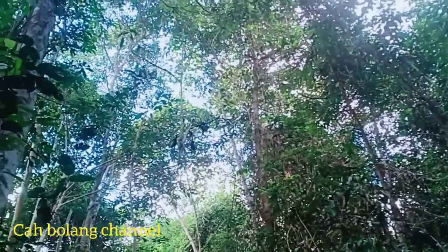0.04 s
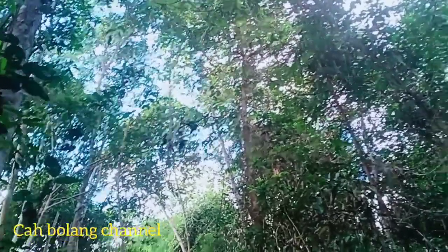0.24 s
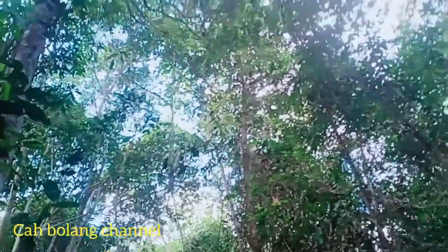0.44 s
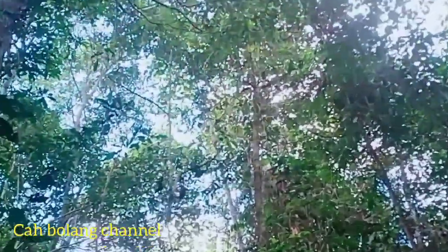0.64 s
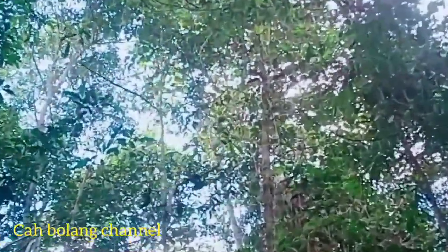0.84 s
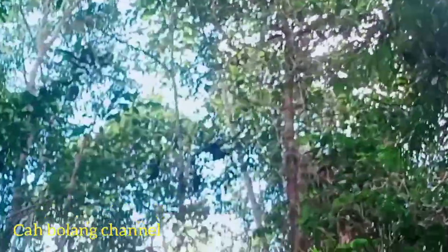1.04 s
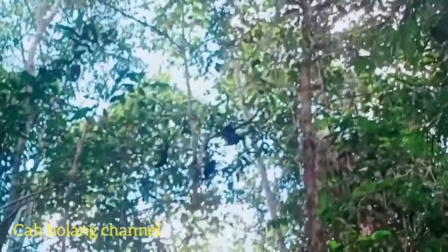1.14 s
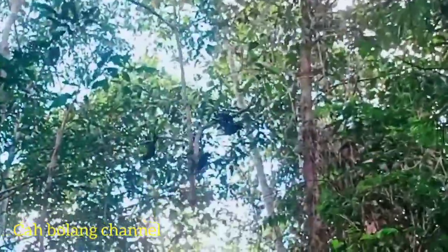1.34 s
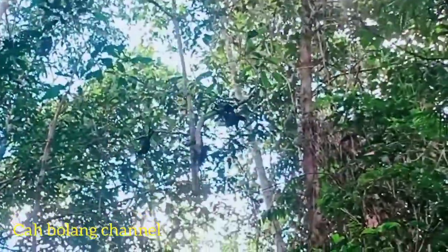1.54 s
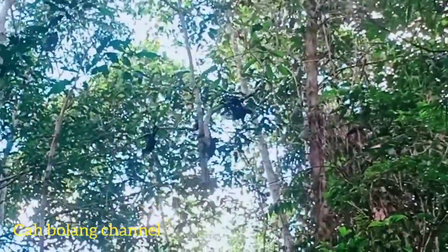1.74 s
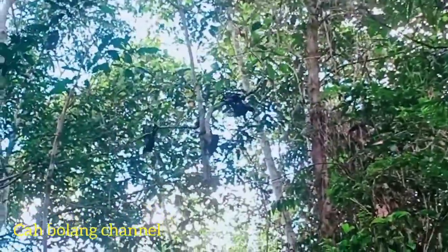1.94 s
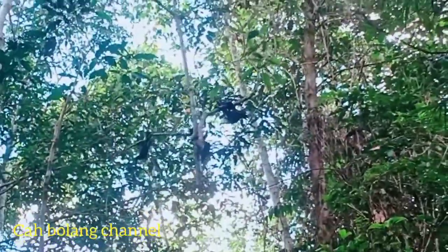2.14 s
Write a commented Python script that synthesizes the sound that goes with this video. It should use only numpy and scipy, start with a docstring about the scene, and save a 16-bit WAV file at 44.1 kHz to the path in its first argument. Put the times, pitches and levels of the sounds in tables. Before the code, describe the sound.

A distant bird gives short, harsh, buzzy rasps to the left, echoing among trees. Early on, hard knocks thump the microphone, followed by creaks and low rumble from handling; faint insects hiss steadily behind.

```python
"""A drongo rasps far off to the left: pulse trains ring two resonances, blurred by echoes among the trunks.
A finger knocks the hand-held camera three times, the first hard enough to clip: pushes ring case modes.
The grip then creaks and rumbles in shaped noise. Insects hiss in noise bands and chirp in gated tone;
a small bird tseeps in falling tones, leaves rustle and forest air murmurs in noise."""
import sys
import numpy as np
from scipy import signal
from scipy.fft import rfft, irfft, next_fast_len
from scipy.io import wavfile
from scipy.ndimage import map_coordinates

SR = 44100
rng = np.random.default_rng(int(sys.argv[2]) if len(sys.argv) > 2 else 0)


def to_wav(sig):
    """Store sig (one row per channel, or 1-D mono) as 16-bit WAV at the path in sys.argv[1].

    Samples outside -1..1 are clipped; the rate is SR.
    """
    pcm = np.clip(np.atleast_2d(sig), -1, 1) * 32767
    pcm = np.round(pcm).astype(np.int16)
    wavfile.write(sys.argv[1], SR, pcm.T)  # frames by channels


def volts_from_db(level):
    """Convert decibel levels to linear amplitude ratios."""
    exponent = np.asarray(level, float) / 20
    return 10 ** exponent


N = 97020
T = np.arange(N) / SR


def unit(x):
    """Scaled to rms 1."""
    return x / np.sqrt(np.mean(x ** 2) + 1e-20)


def along(points, hz):
    """Interpolates (hz, value) points on a log frequency axis."""
    point_hz, value = np.transpose(points)
    return np.interp(np.log(hz + 1), np.log(point_hz + 1), value)


def wobble(knots_hz):
    """Smooth random curve through knots_hz normal draws a second."""
    knots = rng.standard_normal(int(N * knots_hz / SR) + 4)
    return map_coordinates(knots, [T * knots_hz])


def filtered(x, response):
    """x times a complex response of frequency."""
    m = next_fast_len(N + SR // 2)
    return irfft(rfft(x, m) * response(np.fft.rfftfreq(m, 1 / SR)), m)[..., :N]


def panned(x, pan_db):
    """Left louder than right by pan_db."""
    return x * volts_from_db(np.array([[pan_db / 2], [-pan_db / 2]]))


def hump(u, attack):
    """Rises over the share attack of 0-1, then falls."""
    a = np.clip(attack, .05, .95)
    nearer_end = np.minimum(u / a, (1 - u) / (1 - a))
    return np.sin(np.pi / 2 * np.clip(nearer_end, 0, 1))


def band(hz, width_hz):
    """Bell-shaped gain, two standard deviations to the width."""
    return lambda f: np.exp(-.5 * ((f - hz) / (width_hz / 2)) ** 2)


def coloured(points):
    """Gain of an (hz, db) spectrum, silent outside it."""
    return lambda f: volts_from_db(along(points, f)) * (f >= points[0][0]) * (f <= points[-1][0])


def rush(gain):
    """Stereo noise of mid rms 1, as alike and as lopsided as the two ports hear the forest."""
    # likeness of the two ports: hz, likeness
    likeness = [(60, 0.67), (120, 0.63), (240, 0.28), (480, 0.14), (950, 0.24), (1890, 0.04), (3770, 0.016),
                (7520, 0.66), (15000, 0.51)]
    # left minus right level: hz, lean_db
    lean = [(60, -6), (120, 0), (240, 3), (480, 2), (950, 2), (1890, 1.5), (3770, 0), (7520, 8), (15000, 8)]

    def mid_side_gain(f):
        turn = np.arccos(np.clip(along(likeness, f), -1, 1)) / 2
        return gain(f) * np.array([np.cos(turn), np.sin(turn)])

    mid, side = filtered(rng.standard_normal((2, N)), mid_side_gain)
    lean_gain = lambda f: volts_from_db(along(lean, f) / 2 * np.array([[1], [-1]]))
    pair = filtered(np.array([mid + side, mid - side]), lean_gain)
    return pair / pair.mean(0).std()


def echoed(dry, pan_db):
    """A bird's direct sound plus equally strong decaying-noise echoes, near and far among the trunks."""
    near_t60_s, far_t60_s, far_db = 0.75, 1.3, -9
    decay = volts_from_db(-60 * T / near_t60_s) + volts_from_db(far_db - 60 * T / far_t60_s)
    tail = rng.standard_normal((2, N)) * decay * (T > .004)
    wet = signal.fftconvolve(dry[None], tail / np.linalg.norm(tail[0]), axes=1)[:, :N]
    return panned(dry, pan_db) + panned(wet, 8)


def rasp(start_s, length_s, level_db, first_hz, last_hz, attack, beak_hz):
    """Uneven syrinx pulses ring a sliding throat resonance and a second without a slide."""
    pulse_median_hz, gap_jitter = 170.9, .35
    size_scatter_db, pitch_scatter, beak_db = 2, .038, -1.23
    ring_peak_s = .002
    draw = rng.standard_normal((60, 6))
    when = np.cumsum(np.exp(gap_jitter * draw[:, 0])) / pulse_median_hz - .5 / pulse_median_hz
    u, t = when / length_s, np.arange(SR // 60) / SR
    size = hump(u, attack) * volts_from_db(level_db + 3 + size_scatter_db * draw[:, 1:3].T)
    throat_hz = first_hz + (last_hz - first_hz) * np.clip(u * 2.45 - .4, 0, 1)
    hz = np.array([throat_hz, beak_hz + 0 * u]) * (1 + pitch_scatter * draw[:, 3:5].T)
    envelope = (t / ring_peak_s * np.exp(1 - t / ring_peak_s)) ** 2
    throat, beak = size[..., None] * np.sin(2 * np.pi * hz[..., None] * t) * envelope
    at = ((start_s + when[:, None]) * SR).astype(int) + np.arange(len(t))
    return np.bincount(at.ravel(), (throat + volts_from_db(beak_db) * beak).ravel(), N + SR)[:N]


def drongo():
    """Falling rasps with a quick attack, and swelling rasps with a slow one."""
    # falling calls: start_s, length_s, level_db, first_hz, last_hz
    falling = [(0.039, 0.12, -57, 2525, 2030), (0.182, 0.19, -55, 2250, 2160),
               (.682, .12, -49.5, 2404, 2150), (0.876, 0.11, -49, 2443, 2150),
               (1.062, 0.11, -48, 2600, 2083), (1.251, .14, -47.5, 2600, 2170),
               (1.451, .14, -49.5, 2600, 2160)]
    # swelling calls: start_s, length_s, level_db, first_hz, last_hz
    swelling = [(.355, 0.11, -52.5, 2450, 2340), (.47, 0.2, -53.5, 2350, 2476)]
    dry = sum(rasp(*call, attack=0.21, beak_hz=2600) for call in falling)
    dry = dry + sum(rasp(*call, attack=0.54, beak_hz=2752) for call in swelling)
    return echoed(dry, 9)


def port_response(f, recoil_hz, recoil_q, modes):
    """A port's second-order recoil plus the case's band-pass resonances."""
    recoil = -f * f / (recoil_hz ** 2 - f * f + 1j * f * recoil_hz / recoil_q)
    ring = sum(gain * 1j * f * width_hz / (hz * hz - f * f + 1j * f * width_hz)
               for hz, width_hz, gain in modes)
    return recoil + ring


def push(start_s, length_s):
    """One smooth sine-squared shove."""
    return np.sin(np.pi * np.clip((T - start_s) / length_s, 0, 1)) ** 2


def knocks():
    """Each blow pushes both ports, which recoil; the case rings dully and clicks."""
    # finger blows: start_s, push_db, left_contact_ms, right_contact_ms, click_db
    strikes = [(.2318, 3.3, .96, 1.55, -29), (.2456, -8, 1.26, 2.0, -23), (.2768, -12, 1.0, 1.3, -23)]
    # case giving way just before a blow, left then right: lead_s, share of push
    giving = [(.00072, .16), (.00053, .21)]
    # port recoil, left then right: recoil_hz, q
    recoils = [(190, 3.6), (99, 4)]
    # case resonances, left then right: hz, width_hz, gain (negative = against the push)
    case_modes = [
        [(84, 37, -2), (159, 80, 2.8), (224, 48, -1.3), (500, 80, .5)],
        [(72.6, 30, -3.9), (201, 234, 4.2), (502, 80, 2.05)],
    ]
    click_hz, click_t60_s, crack_db, crack_t60_s = 2500, .005, -34, .004
    blows, clicks = np.zeros((2, N)), np.zeros(N)
    crackle = unit(filtered(rng.standard_normal(N), band(3000, 5000)))
    for start_s, push_db, left_ms, right_ms, click_db in strikes:
        for side, contact_ms in enumerate((left_ms, right_ms)):
            lead_s, share = giving[side]
            give = share * push(start_s - lead_s, lead_s * 1.2)
            blows[side] += volts_from_db(push_db) * (push(start_s, contact_ms / 1000) - give)
        t = np.maximum(T - start_s, 0)
        click = np.sin(2 * np.pi * click_hz * t) * (1 - np.exp(-t / 0.0001))
        clicks += volts_from_db(click_db - 60 * t / click_t60_s) * click
        clicks += volts_from_db(push_db + crack_db - 60 * t / crack_t60_s) * (t > 0) * crackle
    ports = lambda f: np.array([port_response(f, *recoils[k], case_modes[k]) for k in (0, 1)])
    thumps = filtered(blows, ports) * volts_from_db(np.array([[0], [-6.7]]))  # right port pushed less
    return thumps + panned(clicks, 9)


def grip():
    """The hand shifts on the case: lumpy rumble noise, and a creak of random skin slips plus noise."""
    # hand movement: time_s, rumble_db, creak_db
    moves = [(0.3, -39.5, -61), (0.31, -47, -50), (0.344, -49, -59.5), (0.366, -46, -57),
             (0.438, -56, -68.5), (0.538, -49.5, -43.5), (0.562, -54, -51), (0.582, -51.5, -51),
             (0.63, -55, -45), (0.642, -52.5, -54.5), (0.686, -64, -65), (0.706, -54, -55),
             (0.746, -61, -67), (0.8, -64, -65), (0.818, -58, -71), (0.89, -74, -57.5), (0.91, -54, -49.5),
             (0.922, -74, -66), (0.95, -53, -57.5), (0.96, -68, -65), (1.01, -67, -57), (1.022, -68, -75),
             (1.04, -70, -62), (1.05, -87, -74.5)]
    # rumble spectrum: hz, density_db (per Hz)
    rumble_spectrum = [(15, -43), (25, -11), (108, 0.5), (172, -15.5), (251, -10), (400, -24), (520, -46),
                       (880, -120)]
    # creak spectrum: hz, density_db (per Hz)
    creak_spectrum = [(71, -54), (120, -12.5), (248, -7.5), (340, -8.5), (465, -1), (590, -7), (835, -30.5),
                      (901, -25), (1600, -31.5), (2080, -56), (3520, -120)]
    slips_per_s = 709
    time_s, rumble_db, creak_db = np.transpose(moves)
    fade_in = np.clip((T - time_s[0]) / .015 + 1, 0, 1) ** 2
    late_drop_db = 2 * np.maximum(T - time_s[-1], 0)
    contour = lambda db: volts_from_db(np.interp(T, time_s, db) - late_drop_db) * fade_in
    slips = (rng.random(N) < slips_per_s / SR) * rng.standard_normal(N)
    creak = unit(filtered(unit(slips) + 0.65 * rng.standard_normal(N), coloured(creak_spectrum)))
    rumble = filtered(rng.standard_normal(N), coloured(rumble_spectrum))
    rumble = unit(rumble * volts_from_db(1.5 * wobble(25)))
    return panned(contour(rumble_db) * rumble + contour(creak_db) * creak, -6)


def chorus():
    """Distant cicadas: flickering noise in bands."""
    # cicada spectrum: hz, density_db (per Hz)
    cicada_spectrum = [(2820, -43), (4800, -21), (5620, 0), (5940, -8.5), (6360, -15), (6590, -10),
                       (6810, 0), (7480, 2), (8000, -2.5), (8130, -13), (8510, 1), (8880, -2.5),
                       (9140, -15.5), (9260, -33), (9500, -24.5), (9910, -35), (10400, -16), (13500, -46),
                       (22000, -120)]
    return volts_from_db(-61 + .6 * wobble(3) + .9 * wobble(20)) * rush(coloured(cicada_spectrum))


def shrill():
    """The highest insects: flickering treble noise on a drawn level."""
    # shrill spectrum: hz, density_db (per Hz)
    shrill_spectrum = [(6120, -41.5), (10400, -11), (11400, -1.5), (12700, -6), (13700, 2), (14700, 0),
                       (14900, -0.5), (15600, 0.5)]
    # shrill level: time_s, level_db
    shrill_contour = [(0.0, -66), (0.05, -63), (0.47, -70.5), (1.27, -73), (2.2, -69)]
    shrill_db = np.interp(T, *np.transpose(shrill_contour)) + 1.2 * wobble(7.1) + .8 * wobble(28)
    return volts_from_db(shrill_db) * rush(coloured(shrill_spectrum))


def fading_cicada():
    """A noise band that fades out at the start."""
    # one cicada: hz, width_hz, level_db, end_s
    hz, width_hz, level_db, end_s = (5802.5, 600, -63, 0.06)
    return volts_from_db(level_db) * np.clip(1 - T / end_s, 0, 1) ** .5 * rush(band(hz, width_hz))


def cricket():
    """A phase-wobbled tone gated into quick chirps, well to the left."""
    # one cricket: hz, chirps_per_s, first_chirp_s, level_db
    hz, chirps_per_s, first_s, level_db = (7720, 20.5, -0.5, -67.5)
    phase = (T - first_s) * chirps_per_s % 1
    chirp = hump(phase / .5, .4) * volts_from_db(level_db + 3.62 * wobble(3.6))
    return panned(chirp * np.sin(2 * np.pi * hz * T + 1.5 * wobble(33)), 20)


def whine():
    """A thin insect line: a very narrow noise band of unsteady level."""
    # insect line: hz, width_hz, level_db
    hz, width_hz, level_db = (7090, 30, -72)
    return volts_from_db(level_db + 2.5 * wobble(5)) * rush(band(hz, width_hz))


def insects():
    """Sum of the chorus, the shrill treble, a cicada, a cricket and a whine."""
    return chorus() + shrill() + fading_cicada() + cricket() + whine()


def small_bird():
    """Thin, slightly husky tones that sweep down, with echoes."""
    # tseeps: start_s, length_s, level_db
    tseeps = [(1.788, .025, -65), (1.82, .022, -61.5), (1.857, .028, -60.5), (1.884, .022, -63.5),
              (1.91, .03, -68), (1.952, .035, -60.5)]
    top_hz, drop_hz, husk_hz = 8530, 900, 200
    progress = [np.clip((T - start_s) / length_s, 0, 1) for start_s, length_s, _ in tseeps]
    hz = top_hz - drop_hz * sum(u * (u < 1) for u in progress) + husk_hz * wobble(400)
    swell = sum(volts_from_db(note[2]) * hump(u, 0.36) for u, note in zip(progress, tseeps))
    return echoed(swell * np.sin(2 * np.pi * np.cumsum(hz) / SR), 18)


def leaves():
    """Leaves stir: a soft noise band that comes and goes."""
    # rustle: start_s, length_s, hz, width_hz, level_db
    start_s, length_s, hz, width_hz, level_db = (0.52, 0.73, 3400, 1202, -69)
    swell = hump((T - start_s) / length_s, .3) ** .4
    return volts_from_db(level_db + 1.2 * wobble(15)) * swell * rush(band(hz, width_hz))


def forest_air():
    """Broad, slowly wavering background noise."""
    # air spectrum: hz, density_db (per Hz)
    air_spectrum = [(15, -50), (25, -33), (43, -2.5), (133, 0), (160, -6.5), (200, -4), (365, -6.5),
                    (408, -5), (745, -6.5), (1070, -8.5), (1390, -11.5), (2230, -7.5), (3560, -19.5),
                    (5200, -24.5), (6760, -53), (11400, -120)]
    return volts_from_db(-60.5 + .6 * wobble(4)) * rush(coloured(air_spectrum))


def scene():
    """Birds, handled camera, insects, leaves and forest air."""
    return drongo() + knocks() + grip() + insects() + small_bird() + leaves() + forest_air()


def top_cut(x):
    """Nothing passes above the cut-off."""
    return signal.sosfilt(signal.butter(12, 16500, fs=SR, output="sos"), x)


def record(dry):
    """The input saturates sharply near its limit and adds a small constant offset."""
    limit, hardness, offset = 0.95, 30, 0.0021
    clipped = dry / (1 + np.abs(dry / limit) ** hardness) ** (1 / hardness)
    return top_cut(clipped + offset)


dry = scene()
out = record(dry)
to_wav(out)
```